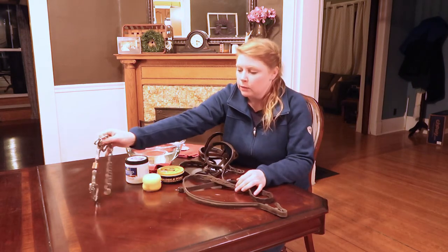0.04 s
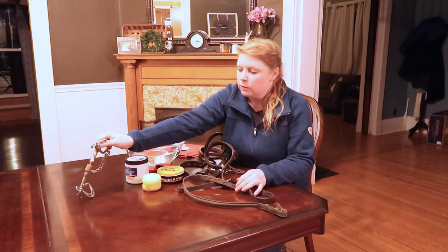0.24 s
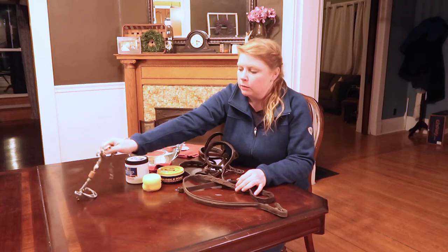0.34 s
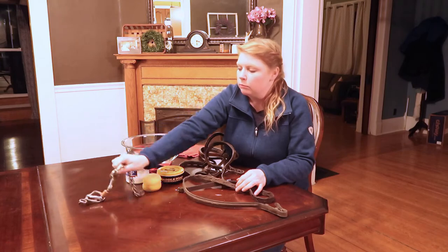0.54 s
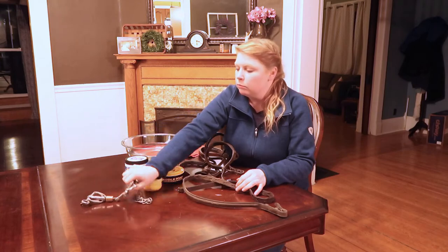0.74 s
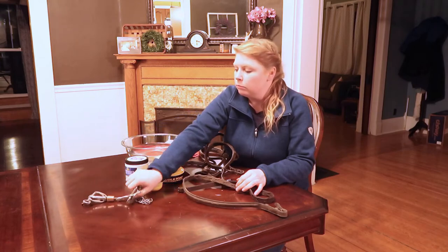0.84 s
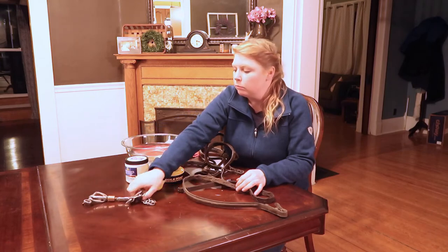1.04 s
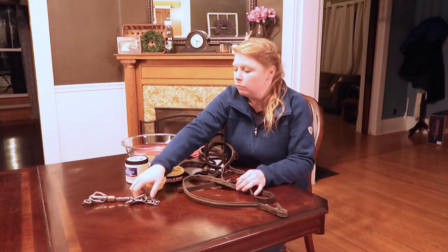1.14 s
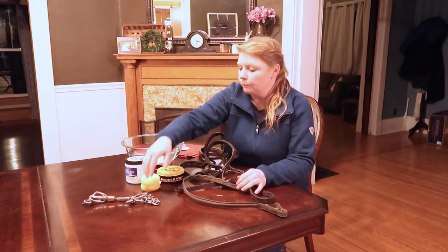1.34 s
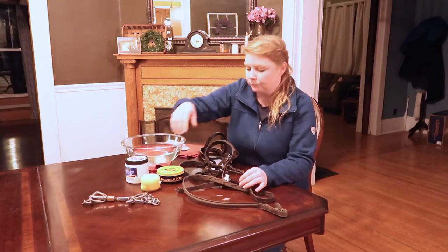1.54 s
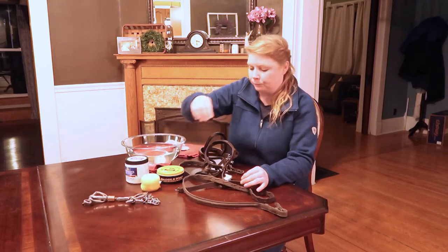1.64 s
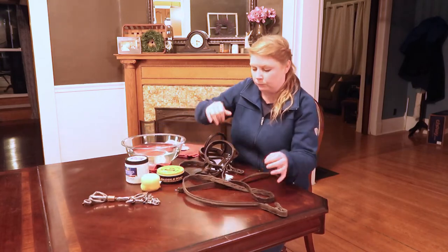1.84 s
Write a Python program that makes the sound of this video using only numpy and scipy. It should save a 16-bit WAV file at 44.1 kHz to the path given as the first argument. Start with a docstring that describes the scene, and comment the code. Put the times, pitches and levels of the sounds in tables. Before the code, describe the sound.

A jointed steel bit is set on a hard wooden tabletop, knocking, rattling and jingling indoors

```python
"""A metal horse bit is lowered onto a wooden table in a live room, over low room noise and a faint whine.
One end knocks, the rings topple, the chain slides, its links pile up and settle; a last part drops.
Each landing is a filtered click that cracks on the board, then booms through decaying wood modes.
Its steel follows as swelling, fading sines with a spray of bright ticks, smeared by board and room echoes.
A few low thumps of the table's frame, dying sines, are strongest from 0.5 to 0.64 s."""
import sys
import numpy as np
from scipy import signal
from scipy.fft import rfft, irfft
from scipy.io import wavfile
from scipy.ndimage import uniform_filter1d, minimum_filter1d

SR = 44100
rng = np.random.default_rng(int(sys.argv[2]) if len(sys.argv) > 2 else 0)


def to_wav(s):
    """Save 16-bit WAV."""
    ch = np.atleast_2d(s).T  # columns
    pcm = np.round(np.clip(ch, -1, 1) * 32767)  # PCM
    wavfile.write(sys.argv[1], SR, pcm.astype(np.int16))


N = 83790  # length [samples]


def amp(db):
    """Decibels to gain."""
    return 10 ** (np.asarray(db) / 20)


def read(points, hz):
    """Reads a curve along a log-frequency axis."""
    point_hz, value = np.transpose(points)
    return np.interp(np.log(hz + 1), np.log(point_hz + 1), value)


def unit(x):
    """Scales to a total energy of one along the last axis, averaged over channels."""
    return x / np.sqrt(np.mean(np.sum(x ** 2, -1)) + 1e-20)


def add(mix, s, sound):
    """Mixes a sound in at time s."""
    part = mix[..., max(round(s * SR), 0):][..., :sound.shape[-1]]
    part += sound[..., :part.shape[-1]]


def fade(t, t60):
    """Exponential decay, 60 dB in t60 seconds."""
    return np.exp(-np.log(1000) * t / t60)


# Heavy parts landing: (time [s], blow level [dB], contact edge [Hz], tilt [dB per octave],
# first crack against blow [dB], clank against click [dB], steel ring send [dB])
BIT_HITS = [ (.2042, 7.5, 1214, -1, 4.5, -14, -53), (.2068, -4, 2740, 3.5, 9, -7, -56),
            (.2088, -1, 848, 0, 6, -2.5, -77), (.2122, -3.5, 2430, 0, 9, -18, -45),
            (.4058, 4, 2730, 2.5, 2.5, -14, -38.5), (.4203, 3, 2500, 2, 3, -11, -61),
            (.5037, 6.5, 3054, 3, 11.5, -6, -70), (.6320, 5, 2647, 0.5, 5.5, -6.5, -45.5),
            (1.0182, 1.5, 1940, 0.3, -16, -35, -74), (1.1360, -4, 1690, 2.5, -4, -19, -61),
            (1.4258, -7, 2520, 1.5, -1.5, -15, -85), (1.4303, 0.5, 1800, 2.5, -1.5, -18, -82)]
# Chain links landing: (time [s], blow level [dB], contact edge [Hz], tilt [dB per octave],
# first crack against blow [dB], clank against click [dB], steel ring send [dB])
CHAIN_HITS = [ (.5192, -0.5, 2730, 0.5, -4, -2, -51), (.5412, -2.5, 3280, 3.5, -5, -2, -65),
              (.5505, -1.5, 3780, 0.2, 4.5, -7, -42.5), (.5597, 2.5, 3260, 5, 9, -7, -44.5),
              (.5969, 2, 2980, 4, -11, -19, -40.5), (.6070, -4, 3380, 5.5, 7, -5.5, -40),
              (.6220, -3.5, 3370, 1, 4.5, -4, -39), (.7869, -4.5, 3060, 3, -8, -18, -54),
              (.8225, 2, 3460, 0.4, -13, -6, -63.5), (.8530, -2, 2150, -1, 0, -6, -77),
              (.8740, -5, 3000, 3, 6, -17, -82), (.9301, -7.5, 2820, 3, 2, -1, -79.5),
              (.9555, -17.5, 2790, 4, 11, -13, -92), (.9680, -7, 2899, 6.5, -12, -9, -80),
              (1.0965, -3.5, 2690, 2.7, -7, -2.5, -49), (1.1100, -3.5, 3413, 2.45, -4, -23, -63),
              (1.2214, -11.5, 2610, 9, -6, -13, -64), (1.2529, -10.5, 2800, 1.5, -2, -11, -69),
              (1.2790, -23, 3820, 6.5, 3, -1, -75), (1.3876, -21.5, 3550, -1.5, 2, -26, -83)]


def hardware(count=7):
    """Bit and chain strike several spots; cracks, booming wood and ringing steel spread into the room."""
    spots = [surroundings() for _ in range(count)]
    bit_rings = [bit_ring() for _ in range(count)]
    link_rings = [chain_ring() for _ in range(count)]
    direct, blows, sent = np.zeros(N), np.zeros(N), np.zeros((count, N))
    for hits, rings in ((BIT_HITS, bit_rings), (CHAIN_HITS + touches(), link_rings)):
        for k, (s, db, edge_hz, tilt, crack_db, clank_db, ring_db) in enumerate(hits):
            spot = k % count
            click = amp(db) * strike(edge_hz, tilt, clank_db)
            add(blows, s, click)
            add(direct, s, amp(crack_db) * click)
            add(sent[spot], s, click)
            add(sent[spot], s, amp(ring_db) * rings[spot])
    boom = signal.fftconvolve(blows, tabletop())[:N]
    echoes = sum(signal.fftconvolve(x[None], spot, axes=1)[:, :N] for x, spot in zip(sent, spots))
    return crack(direct) + boom + echoes


CLANK_AT, CLANK_T60_S = 0.88, 0.025  # pitch as a share of the contact edge, decay [s]


def strike(edge_hz, tilt, clank_db):
    """The contact and the short clank of the piece that makes it."""
    click = contact(edge_hz, tilt)
    t = np.arange(len(click)) / SR
    mode = fade(t, CLANK_T60_S) * np.cos(2 * np.pi * CLANK_AT * edge_hz * t)
    clank = unit(signal.fftconvolve(click, mode)[:len(click)])
    return unit(click + amp(clank_db) * clank)


# Colour of a blow on the table: (frequency [Hz], relative level [dB])
WOOD_COLOUR = [(30, -31.5), (80, -20), (150, -6.5), (300, -2), (600, 0.5), (1100, 2.5), (1900, 6),
               (2800, 2.5), (4200, -2), (6000, -8), (9000, -15), (15000, -13)]
EDGE_ORDER = 4.18  # steepness of the treble roll-off above the contact edge


def contact(edge_hz, tilt, size=2048):
    """One causal clack of steel on wood: a shorter contact reaches higher, a lighter piece has less bass."""
    hz = abs(np.fft.fftfreq(size, 1 / SR))
    octaves = np.log2(hz / edge_hz + 0.0075)  # the offset keeps the log finite at 0 Hz
    rolloff = np.sqrt(1 + (hz / edge_hz) ** (2 * EDGE_ORDER))
    gain = amp(read(WOOD_COLOUR, hz) + tilt * octaves) / rolloff
    # Minimum phase packs the energy at the start of the click
    spectrum = np.exp(np.conj(signal.hilbert(np.log(gain + 1e-6))))
    return unit(np.fft.ifft(spectrum).real)


DIRECT_TOP_HZ, BEND_HZ = 4400, 1430


def crack(x):
    """The first sound off the board: bending waves delay its lows a little, and its top is soft."""
    r = np.exp(-2 * np.pi * BEND_HZ / SR)
    bent = signal.lfilter([-r, 1], [1, -r], x)  # all-pass
    return signal.lfilter(*signal.butter(2, DIRECT_TOP_HZ, fs=SR), bent)


# Modes of the tabletop: (frequency [Hz], relative level [dB], decay t60 [s])
TABLE_MODES = [(262, -3, .4), (400, 1, .45), (500, 0, .36), (547, -2, .42), (620, -7, .31), (764, -1, .38),
               (930, -6, .27), (1047, 0, .3), (1285, -5, .3), (1590, -5, .33), (1964, -9, .25),
               (2190, -8, .25), (2392, -7, .25), (2598, -8, .25)]
TABLE_DB, TABLE_RISE_S = -4, 0.002


def tabletop():
    """The modes of the top, in alternating sign, build up together and die away each at its own rate."""
    t = np.arange(SR) / SR
    modes = np.zeros(SR)
    for k, (hz, db, t60) in enumerate(TABLE_MODES):
        modes += (-1) ** k * amp(db) * fade(t, t60) * np.sin(2 * np.pi * hz * t)
    return amp(TABLE_DB) * unit((1 - np.exp(-t / TABLE_RISE_S)) * modes)


RING_SPREAD_DB = 2  # random balance of the steel modes, bit and links alike
# Modes of the steel bit: (frequency [Hz], relative level [dB], decay t60 [s])
BIT_MODES = [(4043, -8, .33), (4581, -17, .35), (5098, -12, .35), (6939, -15, .5), (7249, -23, .6),
             (7704, -13, .22), (7940, -18, .5), (8850, -8, .2), (9020, -15, .25), (10090, -19, .25),
             (10528, -19, .4), (11860, -21, .25), (12930, -22, .3), (14620, -20, .25)]
RING_RISE_S, WAVER = 0.01, 1.5  # swell [s], depth of the waver


def bit_ring():
    """The wavering ring of the jointed bit swells quickly, with a dying spray of bright ticks."""
    swell = 1 - np.exp(-np.arange(SR) / SR / RING_RISE_S)
    return ring(BIT_MODES, RING_RISE_S, RING_SPREAD_DB, waver=WAVER) + swell * buzz()


# Modes of the chain links: (frequency [Hz], relative level [dB], decay t60 [s])
LINK_MODES = [(8300, -10, 0.13), (8600, -31, .2), (10300, -21, 0.12), (10800, -28, .16),
              (12700, 4.5, 0.067), (13400, -6.5, .13), (13900, -3, .14), (15100, -3.5, .13),
              (15400, -4, .13)]
# A landing link jostles its neighbours, each of a slightly different size
JOSTLE_S, LINK_RISE_S, LINK_DETUNE = 0.012, 0.00077, 0.0041


def chain_ring(count=4):
    """Several links jingle within a moment of each other, their modes slightly and randomly detuned."""
    out = buzz()
    for delay in JOSTLE_S * rng.random(count):
        link = ring(LINK_MODES, LINK_RISE_S, RING_SPREAD_DB, LINK_DETUNE)
        add(out, delay, link / np.sqrt(count))
    return out


WAVER_S = 0.011  # time between waver points: loose joints make the steel's ring waver


def ring(modes, rise_s, spread_db=0, detune=0, waver=0):
    """Sines that swell quickly and die; their balance and pitch can vary at random."""
    t = np.arange(SR) / SR
    chance = rng.standard_normal((len(modes), 3))
    wobble = rng.standard_normal((len(modes), 256, 2)) @ [1, 1j]  # shakes both size and phase
    out = np.zeros(SR)
    for (hz, db, t60), (balance, pitch, phase), w in zip(modes, chance, wobble):
        u = t[t < t60 * np.sqrt(2)]
        shake = 1 + waver * np.interp(u / WAVER_S, np.arange(len(w)), w)
        size = amp(db + spread_db * balance) * fade(u, t60) * shake
        turns = hz * (1 + detune * pitch) * u + phase
        add(out, 0, (size * np.exp(2j * np.pi * turns)).real)
    return (1 - np.exp(-t / rise_s)) * out


# Colour of the loose joints' chatter: (frequency [Hz], relative level [dB])
BUZZ_COLOUR = [(2000, -33.5), (4500, 1.5), (6500, 7), (9000, -7), (11000, -27), (13500, -7.5), (15500, 4.5)]
BUZZ_DB, BUZZ_T60_S, BUZZ_TICKS_PER_S = -4.5, 0.18, 850


def buzz():
    """Loose joints chatter after a blow: a dying spray of tiny bright ticks."""
    t = np.arange(SR) / SR
    ticks = rng.standard_normal(SR) * (rng.random(SR) < BUZZ_TICKS_PER_S / SR)
    ticks = irfft(rfft(ticks) * amp(read(BUZZ_COLOUR, np.fft.rfftfreq(SR, 1 / SR))), SR)
    return amp(BUZZ_DB) * ticks / ticks.std() * fade(t, BUZZ_T60_S)


# Links sliding over each other: (start time [s], length [s], central level of one touch [dB])
RATTLES = [(0.445, 0.053, -18), (0.534, 0.14, -15), (1.058, 0.12, -20), (1.235, 0.071, -24.5)]
TOUCHES_PER_S, TOUCH_SPREAD_DB, TOUCH_SPREAD_OCTAVES = 110, 5.5, 0.37
TOUCH_HZ, TOUCH_TILT = 3890, 1  # central contact edge, tilt [dB per octave]
TOUCH_CLANK_DB, TOUCH_RING_DB = -16, -55  # against the click, against the touch level


def touches():
    """Small random clinks while the chain slides, as rows like its landings."""
    rows = []
    for start, length, db in RATTLES:
        count = max(round(length * TOUCHES_PER_S), 1)
        for k, (when, strength, pitch) in enumerate(rng.random((count, 3))):
            s = start + length * (k + when) / count
            level = db + TOUCH_SPREAD_DB * (2 * strength - 1)
            edge_hz = TOUCH_HZ * 2 ** (TOUCH_SPREAD_OCTAVES * (2 * pitch - 1))
            rows.append((s, level, edge_hz, TOUCH_TILT, 0, TOUCH_CLANK_DB, level + TOUCH_RING_DB))
    return rows


# The weight of the hardware shakes the whole table: (time [s], level [dB])
THUMPS = [(0.209, -62), (0.505, -35.5), (0.544, -38.5), (0.635, -36)]
# Lowest modes of the table: (frequency [Hz], relative level [dB], decay t60 [s])
FRAME_MODES = [(74, -4, 0.35), (113, 0.5, .45), (151, 5, 0.35)]
FRAME_RISE_S = 0.0053


def thumps():
    """A few low thumps of the table's frame as dying sines, strongest from 0.5 to 0.64 s."""
    out = np.zeros(N)
    for s, db in THUMPS:
        add(out, s, amp(db) * ring(FRAME_MODES, FRAME_RISE_S))
    return out


# Decay of the room: (frequency [Hz], t60 [s])
ROOM_T60 = [(100, 1.43), (330, 0.6), (870, 0.5563), (2300, 0.63), (6000, 0.22), (14000, 0.1962)]
# Colour of the room's sound: (frequency [Hz], relative level [dB])
ROOM_COLOUR = [(100, -5.5), (400, 7), (1000, -1), (2500, -6.5), (5000, 7), (9000, 5.5), (14000, 2)]
ROOM_DB, ROOM_GAP_S, ROOM_BUILD_S = 5, 0.0063, 0.0044
BOARD_DB, BOARD_T60_S = 2.5, 0.069  # dense flutter of the board just after a blow


def surroundings(size=256):
    """The brief flutter of the board and the tail of the room, heard from one spot on the table."""
    t = np.arange(SR) / SR
    hz, frame_s, z = signal.stft(scatter(t), SR, nperseg=size)
    decay = fade(frame_s, read(ROOM_T60, hz)[:, None])  # each band dies at its own rate
    z = stereo(z, hz[:, None]) * amp(read(ROOM_COLOUR, hz))[:, None] * decay
    build = np.clip((t - ROOM_GAP_S) / ROOM_BUILD_S, 0, 1)
    tail = signal.istft(z, SR, nperseg=size)[1][:, :SR] * build
    flutter = irfft(stereo(rfft(scatter(t)), np.fft.rfftfreq(SR, 1 / SR)), SR)
    board = flutter * fade(t, BOARD_T60_S)
    return amp(ROOM_DB) * unit(tail) + amp(BOARD_DB) * unit(board)


def scatter(t, size=12):
    """Two trains of sparse reflections of random sign, one in every 12 samples."""
    taps = np.zeros((2, len(t)))
    at = np.arange(0, len(t) - size, size)
    at = at + rng.integers(0, size, (2, len(at)))
    np.put_along_axis(taps, at, rng.choice([-1., 1.], at.shape), 1)
    return taps


# Stereo width: (frequency [Hz], side against middle [dB])
WIDTH = [(100, -28), (350, -21), (1400, -13.5), (2800, -12.5), (4500, -2.5), (8000, 1.5), (15000, 11.5)]


def stereo(z, hz):
    """Two unrelated spectra become left and right: near mono in the bass, wide in the treble."""
    side = amp(read(WIDTH, hz))
    return np.array([z[0] + side * z[1], z[0] - side * z[1]]) / np.sqrt(1 + side ** 2)


# Colour of the room noise: (frequency [Hz], relative level per Hz [dB])
HUM_COLOUR = [(20, -3), (45, -1), (80, 1), (130, 5), (200, -4.5), (400, -9.5), (1000, -15.5), (2500, -21),
              (5000, -27), (10000, -35), (15000, -47.5)]
HUM_DB = -48.5
WHINE_HZ, WHINE_WIDTH_HZ, WHINE_DB = 13000, 70, -16  # level on the scale of the noise colour


def background():
    """Low steady room noise with a faint high whine, a narrow band of the same noise."""
    hz = np.fft.rfftfreq(N, 1 / SR)
    whine = amp(WHINE_DB) * np.exp(-((hz - WHINE_HZ) / WHINE_WIDTH_HZ) ** 2)
    gain = amp(read(HUM_COLOUR, hz)) + whine
    noise = irfft(stereo(rfft(rng.standard_normal((2, N))), hz) * gain, N)
    return amp(HUM_DB) * noise / noise.std()


def scene():
    """The hardware in the quiet room."""
    return hardware() + thumps() + background()


PEAK, CUTOFF_HZ = 0.92, 15700  # limiter ceiling (full scale is 1), top of the band


def record(dry, size=65):
    """A fast limiter holds down the very highest peaks; then the band limit."""
    lowpass = signal.firwin(511, CUTOFF_HZ, window=("kaiser", 9), fs=SR)
    gain = PEAK / np.maximum(abs(dry).max(0), PEAK)
    limited = dry * uniform_filter1d(minimum_filter1d(gain, size), size)
    return signal.oaconvolve(limited, lowpass[None], "same")


dry = scene()
out = record(dry)
to_wav(out)
```